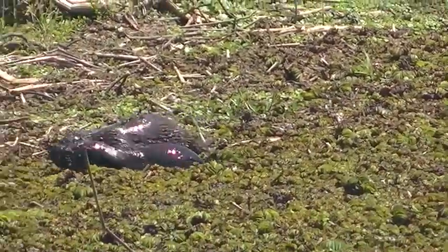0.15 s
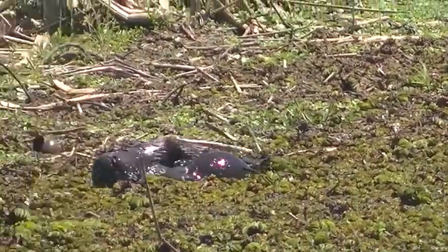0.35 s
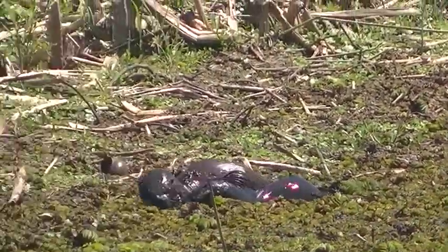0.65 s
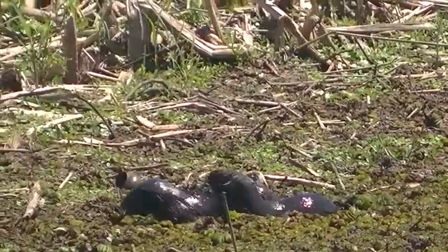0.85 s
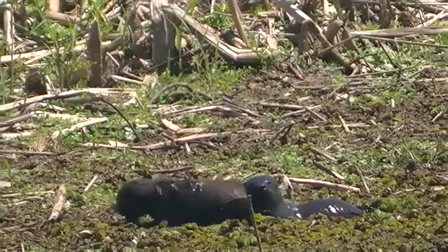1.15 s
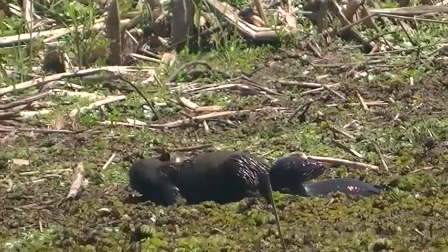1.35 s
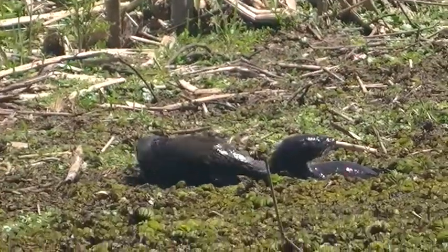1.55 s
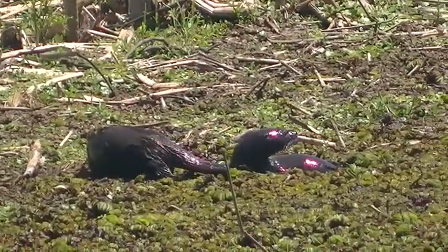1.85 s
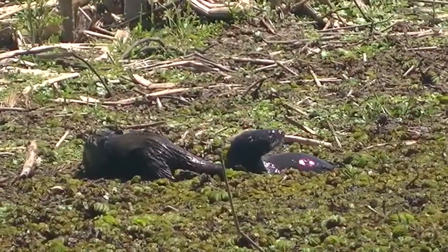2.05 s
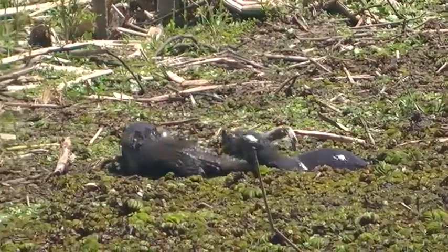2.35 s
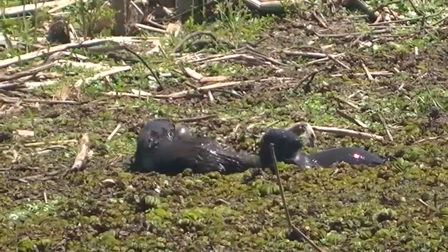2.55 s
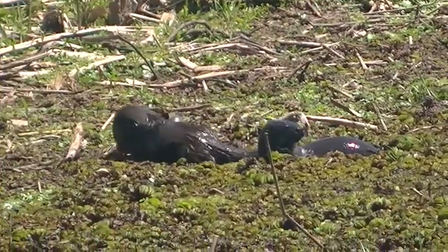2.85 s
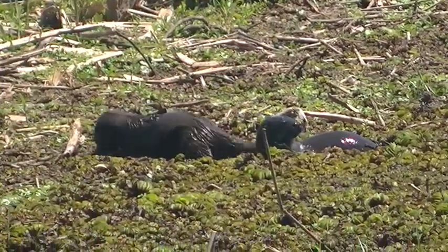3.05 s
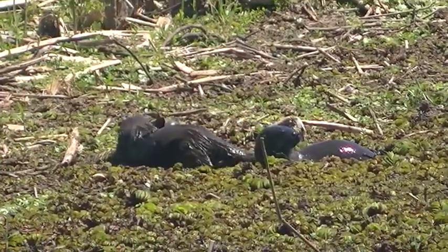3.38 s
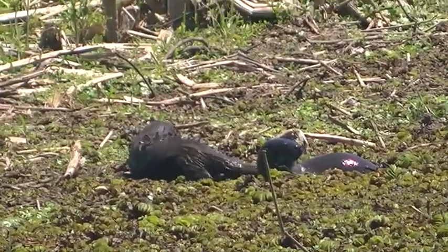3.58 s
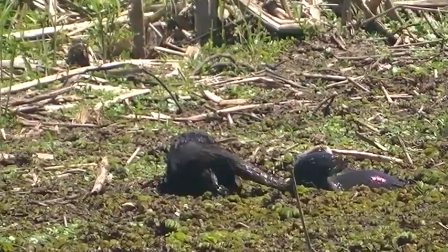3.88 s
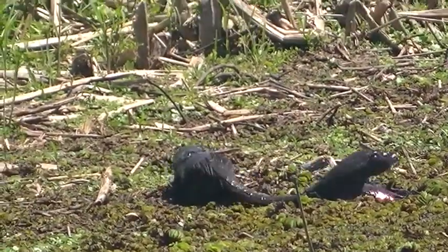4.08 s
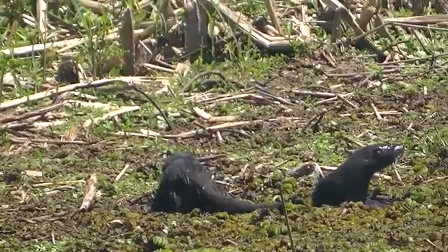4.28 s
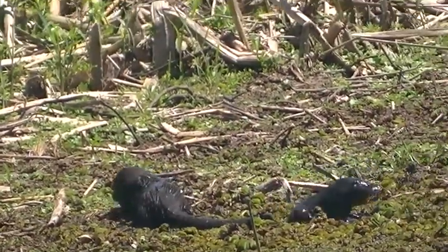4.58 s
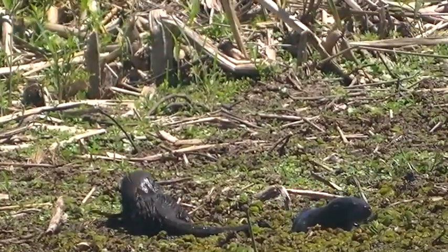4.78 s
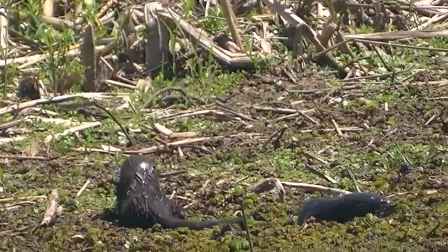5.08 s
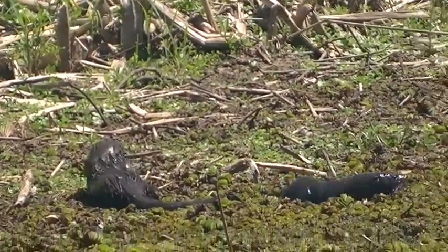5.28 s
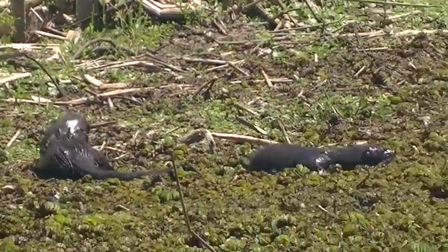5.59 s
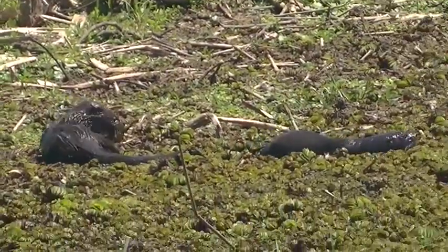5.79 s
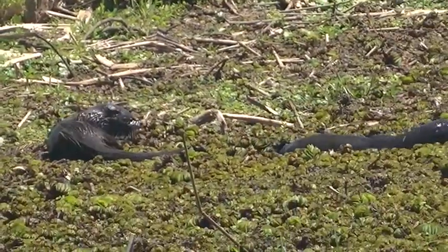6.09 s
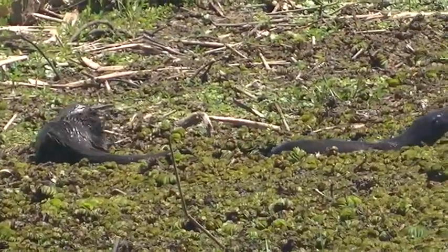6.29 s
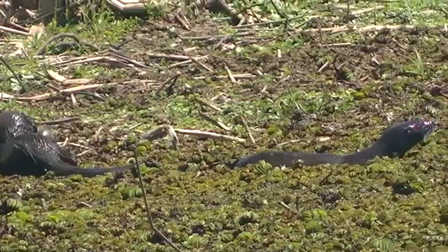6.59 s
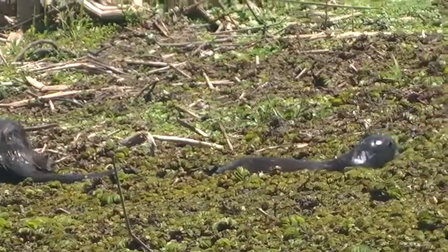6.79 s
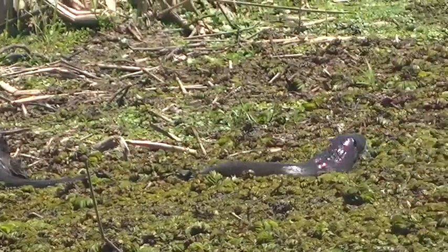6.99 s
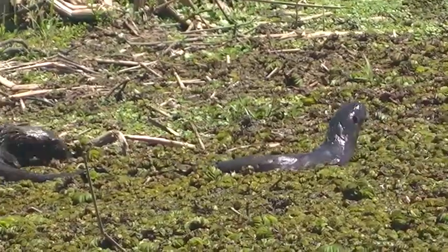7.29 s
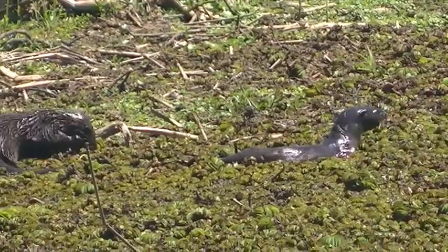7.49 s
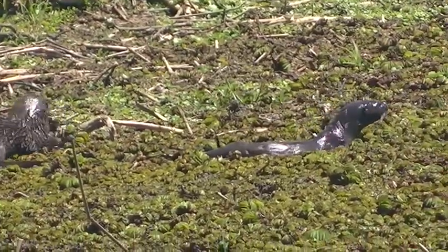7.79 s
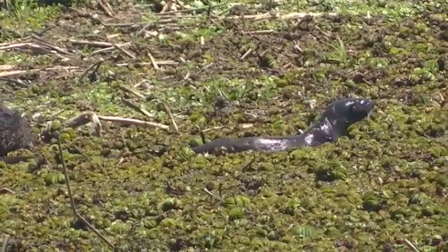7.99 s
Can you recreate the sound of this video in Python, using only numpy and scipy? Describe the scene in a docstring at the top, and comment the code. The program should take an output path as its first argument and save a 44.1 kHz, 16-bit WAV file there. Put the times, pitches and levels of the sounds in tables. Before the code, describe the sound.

Sunny wetland ambience: shrill pulsing insects, soft wind rumble, scattered thin peeps, handling thumps in the first second, and rising bird whoops at the end.

```python
"""A sunny marsh: insects buzz near 8 kHz (pulsed resonant noise) over a rumbling, rushing breeze (coloured
noise) and small birds (gliding sines). Dull knocks reach the camera body in the first second (smooth pulses).
The zoom motor ticks faintly in two runs (bursts of resonant noise), from 0.6 s and 5.5 s; a thin whirr rises
early. Wet plants click where otters move (ringing crackles), mostly after 3 s; a nearer insect fades from
4.4 s. From 6.9 s one bird swoops three times; it ends with three rising whoops."""
import sys
import numpy as np
from scipy import signal
from scipy.fft import rfft, irfft
from scipy.io import wavfile
from scipy.ndimage import uniform_filter1d, map_coordinates

SR = 44100
rng = np.random.default_rng(int(sys.argv[2]) if len(sys.argv) > 2 else 0)


def digitize_waveform(pressure):
    """Quantize a signal to 16-bit integers and store it at the path in sys.argv[1].

    Rows of a 2-D input are taken as channels; values are limited to [-1, 1].
    """
    field = np.atleast_2d(pressure).T
    bounded = np.clip(field, -1, 1)
    quanta = np.round(bounded * 32767).astype(np.int16)
    wavfile.write(sys.argv[1], SR, quanta)


N = 358974
TIME = np.arange(N) / SR
FREQS = np.maximum(np.arange(N // 2 + 1) * SR / N, 1)


def from_db(db):
    """Decibels to amplitude gain."""
    return 10 ** (np.asarray(db) / 20)


def rms_one(x):
    """Scale to unit power."""
    return x / np.sqrt(np.mean(x ** 2) + 1e-20)


def in_time(rows):
    """Interpolate each column of a curve at every sample; column 0 is t/s."""
    t_s, *columns = np.transpose(rows)
    return [np.interp(TIME, t_s, column) for column in columns]


def noise():
    """White noise."""
    return rng.standard_normal(N)


def coloured(x, points):
    """Weight a steady sound's spectrum, dB linear over log frequency; rms 1."""
    hz, db = np.transpose(points)
    gain_db = np.interp(np.log(FREQS), np.log(hz), db, left=-90, right=-90)
    return rms_one(irfft(rfft(x) * from_db(gain_db), N))


def drift(rate_hz):
    """Slow random signal, Gaussian low-pass of scale rate_hz; rms 1."""
    lowpass = np.exp(-.5 * (FREQS / rate_hz) ** 2)
    return rms_one(irfft(rfft(noise()) * lowpass, N))


def resonate(x, hz, width_hz):
    """Two-pole resonance with gain 1 on top."""
    r = np.exp(-np.pi * width_hz / SR)
    zeros = np.array([1, 0, -1]) * (1 - r * r) / 2
    poles = [1, -2 * r * np.cos(2 * np.pi * hz / SR), r * r]
    return signal.lfilter(zeros, poles, x + 1e-18)


def add(out, t_s, sound):
    """Mix a short sound in at t_s."""
    start = int(np.clip(t_s * SR, 0, N))
    out[start:start + len(sound)] += sound[:N - start]


def reeds(x, t60_s, wet_db):
    """Reeds and trees scatter a thin tail of sparse, decaying echoes."""
    t = TIME[:SR // 2]
    sparse = rng.standard_normal(len(t)) * (rng.random(len(t)) < .02)
    echoes = sparse * from_db(-60 * t / t60_s) * (t > .008)
    tail = signal.fftconvolve(x, echoes / np.linalg.norm(echoes))[:N]
    return x + from_db(wet_db) * tail


def air(rumble_db=-1.5, rush_db=-3.5, rumble_flicker_db=0.74, rush_flicker_db=2.22, far_db=-54.5):
    """The breeze drives a lumpy rumble, which swells in gusts, and a softer rush; the far hiss is even."""
    # breeze strength: t/s, level/dB
    breeze = [(0.0, -38.5), (1.16, -40), (1.99, -43), (3.47, -41), (3.78, -41), (4.24, -36.5),
              (4.56, -42.5), (4.97, -41), (5.51, -43.5), (6.76, -45.5), (8.14, -50.5)]
    # gusts that buffet the microphone: crest t/s, half length/s, rise/dB
    gusts = [(1.05, 0.2, 0.5), (2.61, 0.17, 1), (3.45, 0.18, 2), (4.23, 0.085, 0.5)]
    # spectra of rumble, rush, far marsh with microphone hiss: f/Hz, relative level/dB
    rumble_colour = [(20, -40), (32, -26), (45, -17.5), (62, -9), (85, -4.5), (120, 0.5), (165, -3),
                     (230, -12.5), (400, -26.5)]
    rush_colour = [(110, -44), (170, 1.5), (220, 3), (310, 0), (420, -3.5), (600, -9), (800, -14),
                   (1200, -24.5), (2200, -34.5)]
    far_colour = [(400, -0.5), (900, 1), (1400, -2.5), (1850, 1), (2230, 2), (2550, -3), (3200, 0),
                  (3900, -4), (5500, -6), (7000, -9), (10500, -11.5), (13500, -14.5), (15600, -8.5)]
    rush_share = 0.094  # of a gust's rise in dB

    breeze_db, = in_time(breeze)
    gust_db = sum(db * np.exp(-((TIME - t_s) / half_s) ** 2) for t_s, half_s, db in gusts)
    rumble_level_db = breeze_db + rumble_db + gust_db + rumble_flicker_db * drift(7.4)
    rumble = from_db(rumble_level_db) * coloured(noise(), rumble_colour)
    rush_level_db = breeze_db + rush_db + rush_share * gust_db + rush_flicker_db * drift(20)
    rush = from_db(rush_level_db) * coloured(noise(), rush_colour)
    far_to_top = far_colour + [(SR / 2, far_colour[-1][1])]
    return rumble + rush + from_db(far_db) * coloured(noise(), far_to_top)


def whirr(spread_hz):
    """A faint narrow band of noise whose pitch rises and settles."""
    # t/s, f/Hz, level/dB
    whirr_curve = [(0, 1650, -72), (.2, 1720, -59.5), (.5, 1880, -59), (.7, 2100, -61.5), (1.1, 2230, -66),
                   (1.8, 2180, -69), (3.0, 2200, -76), (8.14, 2220, -67)]
    hz, db = in_time(whirr_curve)
    phase = 2 * np.pi * np.cumsum(hz) / SR
    band = drift(spread_hz) * np.cos(phase) + drift(spread_hz) * np.sin(phase)
    return from_db(db) * rms_one(band)


def strokes(per_s, wander, depth):
    """Loudness of a wing scraping to and fro at a slightly unsteady rate; rms 1."""
    turns = np.cumsum(per_s * (1 + wander * drift(2.0))) / SR + rng.random()
    return rms_one(np.exp(depth * np.cos(2 * np.pi * turns)))


def insects(blur_db=2, solo_depth=1.2, even_s=0.012):
    """File teeth ring each wing in pulses, one per stroke; many far insects blur into a hiss."""
    # chorus level: t/s, level/dB
    chorus_curve = [(0, -42.5), (2.0, -45), (4.3, -44.5), (4.8, -44.5), (6.5, -44.5), (8.14, -44)]
    # chorus spectrum: f/Hz, relative level/dB
    chorus_colour = [(5800, -31), (6550, -17.5), (6900, -12.5), (7250, -5), (7700, -1), (8250, -5),
                     (8650, -4.5), (8950, -13), (9130, -17), (9480, -14), (9850, -27)]
    # chorus members: f/Hz, width/Hz, wing strokes/(1/s)
    singers = [(7124, 640, 70), (7750, 590, 58.5), (8270, 290, 67), (8940, 280, 57)]
    # one nearer insect: t/s, level/dB, wing strokes/(1/s)
    soloist = [(0, -54, 48.5), (1.2, -47.5, 57), (2.4, -47.5, 39), (3.0, -48, 49), (3.7, -49.5, 64),
               (4.4, -49, 52.5), (4.65, -62, 21), (8.14, -85, 76)]
    # its wing resonances, each applied twice: f/Hz, width of one pass/Hz, level/dB
    wing_modes = [(7690, 114, -0.5), (7400, 110, -10), (8430, 660, -10)]

    crowd = sum(rms_one(resonate(noise(), hz, width_hz)) * strokes(per_s, wander=0.0088, depth=0.29)
                for hz, width_hz, per_s in singers)
    crowd = coloured(rms_one(crowd) + from_db(blur_db) * noise(), chorus_colour)
    solo_db, solo_per_s = in_time(soloist)
    wing = sum(from_db(db) * rms_one(resonate(resonate(noise(), hz, width_hz), hz, width_hz))
               for hz, width_hz, db in wing_modes)
    power = uniform_filter1d(wing ** 2, int(even_s * SR))
    wing = wing / np.sqrt(power + 1e-9)  # every stroke has about the same force
    solo = wing * strokes(solo_per_s, wander=0.0039, depth=solo_depth)
    return from_db(in_time(chorus_curve)[0]) * crowd + from_db(solo_db) * solo


def whistle(length_s, swell, pitches_hz, waver=0.0086, flutter_db=1.5, fullness=0.41):
    """One bird note: an unsteady smooth glide, loudest at share swell of its length; rms 1."""
    u = np.linspace(0, 1, max(int(length_s * SR), 64))
    knots = np.arange(0, SR, 200)
    wobble, flutter = (np.interp(np.arange(len(u)), knots, row)
                       for row in rng.standard_normal((2, len(knots))))
    steps = u * (len(pitches_hz) - 1)
    glide_hz = np.exp(map_coordinates(np.log(pitches_hz), [steps], order=2, mode="nearest"))
    shape = np.sin(np.pi / 2 * np.interp(u, [0, np.clip(swell, .1, .9), 1], [0, 1, 0]))
    tone = np.sin(2 * np.pi * np.cumsum(glide_hz * (1 + waver * wobble)) / SR)
    return rms_one(shape ** fullness * from_db(flutter_db * flutter) * tone)


def far_birds(per_s=36, low_hz=2200, high_hz=3800, bend=0.0745):
    """Faint short slurs at random times and pitches, mostly falling."""
    # t/s, level/dB
    twitter = [(0, -61.5), (1.2, -65), (3.0, -67.5), (4.4, -78), (5.0, -62), (8.14, -64)]
    out, (db,) = np.zeros(N), in_time(twitter)
    u = np.linspace(-1, 1, 5)
    for i in np.flatnonzero(rng.random(N) < per_s / SR):
        place, size, slope, arch = rng.random(4)
        length_s = .015 + .03 * size
        centre_hz = low_hz * (high_hz / low_hz) ** place
        pitches_hz = centre_hz * np.exp(bend * ((.5 - 2 * slope) * u - arch * u * u))
        add(out, i / SR, from_db(db[i]) * whistle(length_s, 0.24, pitches_hz))
    return out


def calls(rows, shape, swell):
    """One kind of call: the same contour, stretched and transposed for each note."""
    out = np.zeros(N)
    for t_s, length_s, db, hz in rows:
        add(out, t_s, from_db(db) * whistle(length_s, swell, hz * np.array(shape)))
    return out


def slurs(swell=0.45, bend=2.8):
    """The pitch leaves its start quickly and eases on to the last note; bend 1 is straight."""
    # t/s, length/s, level/dB, first f/Hz, last f/Hz
    slur_rows = [(0.583, 0.21, -60, 2390, 3000), (2.014, 0.073, -54.5, 5450, 3290),
                 (4.023, 0.12, -63, 5820, 5000), (4.099, 0.06, -48, 4250, 3230),
                 (4.19, 0.087, -68, 4900, 5180), (4.31, 0.17, -64, 5420, 4900),
                 (4.49, 0.024, -53, 5300, 5020), (5.154, 0.27, -63, 5850, 4540),
                 (5.772, 0.048, -48.5, 4200, 3190), (5.821, .16, -64, 2430, 2360),
                 (6.332, 0.065, -55.5, 3090, 2840), (6.785, .07, -53, 3350, 2760),
                 (6.869, .12, -56.5, 2360, 1960), (7.003, .107, -61, 2270, 2550),
                 (7.845, .048, -58, 2800, 3050)]
    out, remaining = np.zeros(N), np.linspace(1, 0, 9) ** bend
    for t_s, length_s, db, first_hz, last_hz in slur_rows:
        pitches_hz = last_hz + (first_hz - last_hz) * remaining
        add(out, t_s, from_db(db) * whistle(length_s, swell, pitches_hz))
    return out


def birds():
    """The nearer birds, each kind of call a gliding sine with its own contour."""
    # arched whistles: t/s, length/s, level/dB, top f/Hz; contour: share of top f
    arches = [(.352, 0.046, -54.5, 3650), (1.559, .041, -56.5, 3250), (2.326, .03, -57, 3250),
              (3.859, 0.058, -56.5, 3230), (4.593, 0.13, -58, 3100), (4.92, 0.11, -63, 2580),
              (5.172, 0.088, -54, 2320), (5.443, 0.094, -52, 2310), (5.712, 0.092, -51, 2310),
              (5.992, 0.11, -54.5, 2280), (6.09, 0.17, -59, 2615), (6.31, 0.034, -56, 3400),
              (6.481, .15, -58, 2080), (6.762, 0.036, -49.5, 3360), (7.48, 0.091, -58, 2540)]
    arch_shape = [.87, 0.97, 1, 0.95, .85]
    # chips that dive and spring back: t/s, length/s, level/dB, lowest f/Hz; contour: share of lowest f
    chips = [(2.41, 0.046, -62, 4450), (6.055, 0.0396, -44, 4350), (6.523, .06, -46.5, 4040)]
    chip_shape = [1.27, 1, 1.025, 1.11, 1.19]
    # falling peeps: t/s, length/s, level/dB, first f/Hz; contour: share of that f
    peeps = [(.005, 0.044, -51, 3940), (.072, 0.042, -57, 4130), (.4, 0.056, -55, 2800),
             (3.035, 0.01, -45, 3120), (3.705, 0.029, -54, 2730), (4.632, .068, -65, 5630),
             (4.85, .08, -60.5, 2650), (4.945, .03, -59, 4320), (5.039, .03, -55, 3450),
             (5.215, 0.041, -58, 3970), (5.355, .033, -52, 3580), (5.484, 0.017, -46.5, 3300),
             (5.64, 0.042, -57, 3420), (5.76, 0.019, -51, 4000), (5.921, 0.041, -57, 4200),
             (7.235, 0.18, -61.5, 2530)]
    peep_shape = [0.99, 0.97, .925, .89, .83]
    # low distant coos: t/s, length/s, level/dB, f/Hz
    coos = [(.85, .59, -55, 428), (6.92, .25, -58, 447)]
    small = calls(arches, arch_shape, swell=0.66) + calls(chips, chip_shape, swell=0.53)
    small = small + calls(peeps, peep_shape, swell=0.85)
    return small + slurs() + calls(coos, [1, 1, 1], swell=0.45)


def song(flutter_db=3.0):
    """One bird sings three ragged falling swoops, then three rising whoops, each led in by a pip."""
    # swoops: t/s, level/dB
    swoop_rows = [(6.948, -51), (7.203, -54), (7.466, -49)]
    # whoops: t/s, length/s, level/dB, last f/Hz; contour: share of last f
    whoops = [(7.744, .06, -45, 3040), (7.938, 0.069, -45.5, 3276), (8.108, 0.066, -46, 3230)]
    whoop_shape = [.51, .8, .96, .985, 1]
    swoop_s, swoop_hz = .092, [4330, 2650, 1950, 1670, 1480]
    pip_lead_s, pip_s, pip_hz = 0.014, 0.019, [2880, 2790, 2720]
    pip_db = -2.5  # relative to the whoop

    swoops = np.zeros(N)
    for t_s, db in swoop_rows:
        note = whistle(swoop_s, 0.13, swoop_hz, waver=0.016, flutter_db=flutter_db)
        add(swoops, t_s, from_db(db) * note)
    pips = [(t_s - pip_lead_s, pip_s, db + pip_db, 1) for t_s, _, db, _ in whoops]
    return swoops + calls(pips, pip_hz, swell=.48) + calls(whoops, whoop_shape, swell=.85)


def clicks(snap_s=0.0067, pop_width_hz=200, pop_db=2, dull_hz=6500):
    """A brief crackle rings the stalk and a small pocket of water; distance dulls it."""
    # t/s, peak level before dulling/dB, pop f/Hz
    click_rows = [(0.523, -38, 1500), (3.076, -32, 930), (4.35, -33.5, 1020), (5.022, -38.5, 1930),
                  (5.137, -37.5, 5100), (5.513, -37, 2200), (6.29, -39, 4000), (6.335, -36, 2960),
                  (6.462, -34.5, 1900), (7.765, -32, 2970)]
    # stalk resonances: f/Hz, width/Hz, level/dB
    stalk = [(994.3, 280, -0.5), (2520, 1200, -1.5), (3500, 210, -0.5), (5060, 780, -8.5)]
    out, t = np.zeros(N), TIME[:SR // 20]
    for t_s, db, pop_hz in click_rows:
        snap = rng.standard_normal(len(t)) * np.exp(-t / snap_s)
        modes = stalk + [(pop_hz, pop_width_hz, pop_db)]
        ring = sum(from_db(mode_db) * resonate(snap, hz, width_hz) for hz, width_hz, mode_db in modes)
        add(out, t_s, from_db(db) * ring / np.abs(ring).max())
    return signal.sosfilt(signal.butter(2, dull_hz, fs=SR, output="sos"), out)


def bursts(start_s, end_s, hz, width_hz, burst_s, uneven_db, jitter_s, per_s=29.97):
    """A run of short rattling bursts of uneven strength and timing in one resonance."""
    out, period_s = np.zeros(N), 1 / per_s
    t = TIME[:int(period_s * SR)] - period_s / 2
    for t_s in np.arange(start_s, end_s, period_s):
        size, late = rng.standard_normal(2)
        ring = resonate(resonate(rng.standard_normal(len(t)), hz, width_hz), hz, width_hz)
        burst = rms_one(ring * np.exp(-.5 * (t / burst_s) ** 2))
        add(out, t_s - period_s / 2 + late * jitter_s, from_db(uneven_db * size) * burst)
    return out


def zoom_motor(rattle_db=-6.3, whine_db=-5.5, fade_db_per_s=1.5):
    """The lens advances in bursts of steps that ring the barrel and at times whine."""
    # runs, easing as they go: first burst t/s, end t/s, initial level before rattle_db/dB
    zoom_runs = [(.564, 2.78, -50), (5.52, 7.52, -50.5)]
    # whining stretches: first burst t/s, end t/s, f/Hz, level before whine_db/dB
    whines = [(.565, 1.08, 2930, -60), (0.7, 2.3, 3880, -68), (1.144, 1.69, 4840, -60),
              (1.712, 2.55, 2920, -59), (1.905, 2.03, 4850, -58), (2.578, 2.7, 4830, -60),
              (5.557, 6.45, 2970, -56.5), (6.464, 6.62, 4900, -63), (6.8, 7.21, 4840, -60),
              (7.254, 7.52, 2930, -58.5)]
    barrel_hz, barrel_width_hz, whine_width_hz = 940, 260, 120
    rattle = sum(from_db(db - fade_db_per_s * (TIME - start_s))
                 * bursts(start_s, end_s, barrel_hz, barrel_width_hz,
                          burst_s=0.0051, uneven_db=3.0, jitter_s=0.00149)
                 for start_s, end_s, db in zoom_runs)
    whine = sum(from_db(db) * bursts(start_s, end_s, hz, whine_width_hz,
                                     burst_s=0.0046, uneven_db=3.0, jitter_s=0.002)
                for start_s, end_s, hz, db in whines)
    return from_db(rattle_db) * rattle + from_db(whine_db) * whine


def knocks(low_cut_hz=160, case_hz=1450, tick_ms=0.47):
    """A soft push plus a short tick of the case; the microphone's bass cut makes it swing and rebound."""
    # t/s, push level before bass cut/dB, contact width/ms, tick level before bass cut/dB
    knock_rows = [(0.2764, -11.5, 0.45, -42), (0.3397, -16.5, 0.65, -60), (0.365, -4, 0.45, -24),
                  (0.4315, -14, 0.51, -40), (0.4785, -13, 0.58, -42), (.63, -13.5, 0.46, -38),
                  (0.6456, -6, 0.52, -38), (0.768, -22, 0.61, -55), (0.8332, -2.5, 0.41, -41)]
    push = np.zeros(N)
    for t_s, db, width_ms, tick_db in knock_rows:
        ms = np.clip((TIME - t_s) * 1000, -6, 6)
        push -= from_db(db) * np.exp(-.5 * (ms / width_ms) ** 2)
        tick = np.exp(-.5 * (ms / tick_ms) ** 2) * np.sin(2 * np.pi * case_hz * (TIME - t_s))
        push += from_db(tick_db) * tick
    return signal.sosfilt(signal.butter(3, low_cut_hz, "high", fs=SR, output="sos"), push)


def scene():
    """The open marsh plus the sounds of the camera itself."""
    scattered = reeds(birds() + far_birds() + clicks(), t60_s=0.26, wet_db=-9)
    singer = reeds(song(), t60_s=0.28, wet_db=-8)
    marsh = air() + whirr(spread_hz=91) + insects() + scattered + singer
    return (marsh + zoom_motor() + knocks())[None]


def record(dry, cutoff_hz=15750):
    """A steep elliptic low-pass cuts the top."""
    return signal.sosfilt(signal.ellip(12, .1, 80, cutoff_hz, fs=SR, output="sos"), dry)


dry = scene()
out = record(dry)
digitize_waveform(out)
```